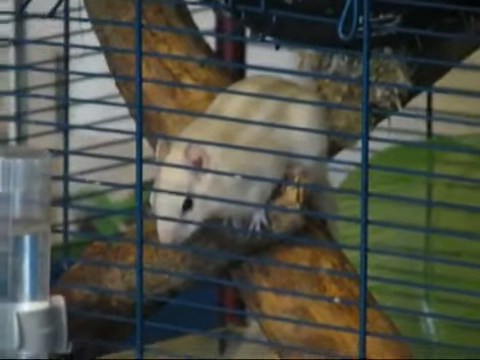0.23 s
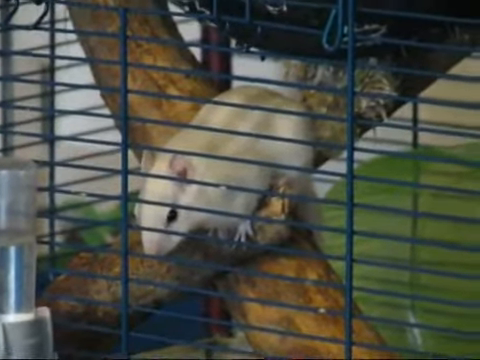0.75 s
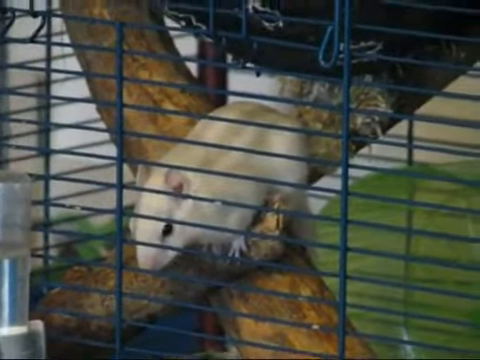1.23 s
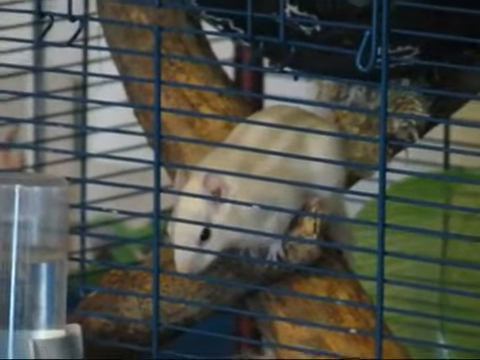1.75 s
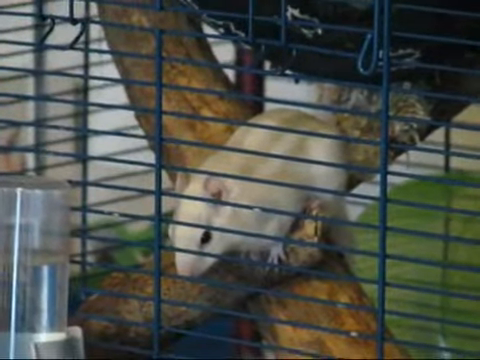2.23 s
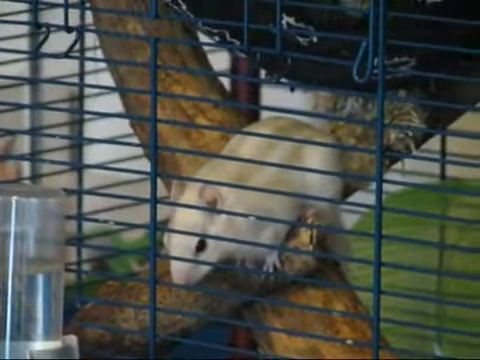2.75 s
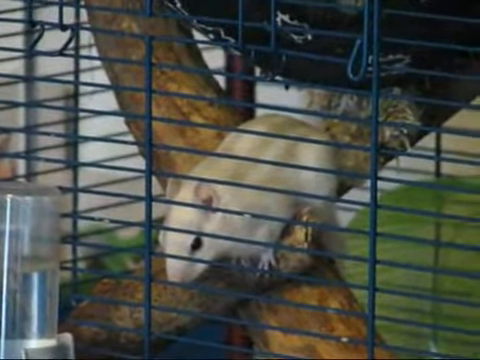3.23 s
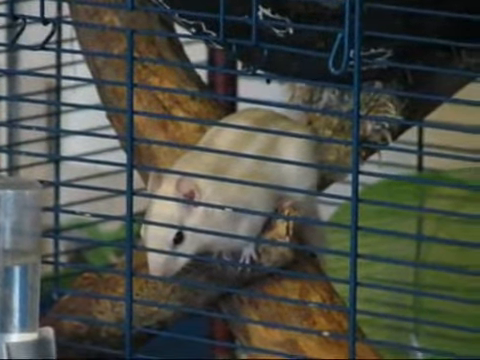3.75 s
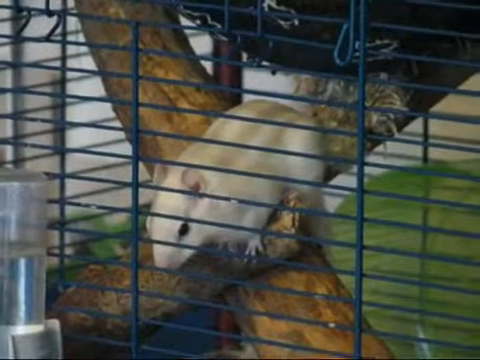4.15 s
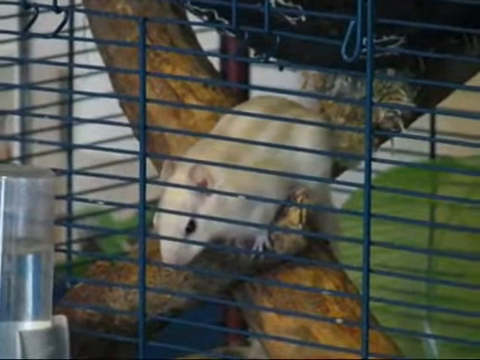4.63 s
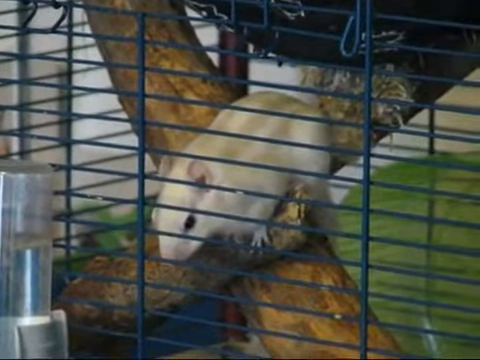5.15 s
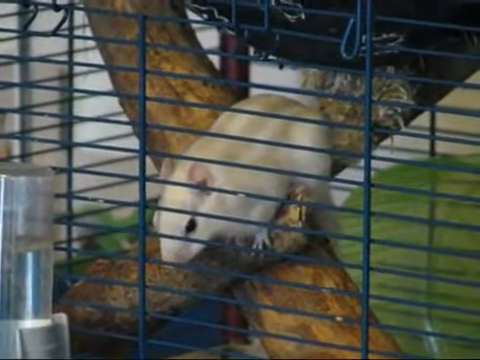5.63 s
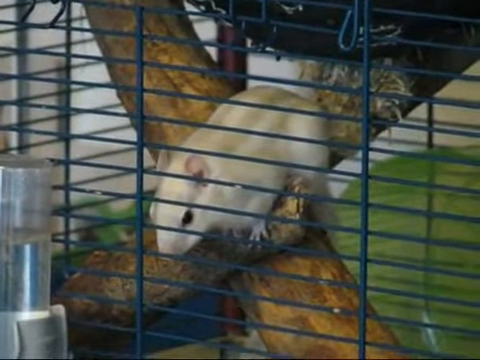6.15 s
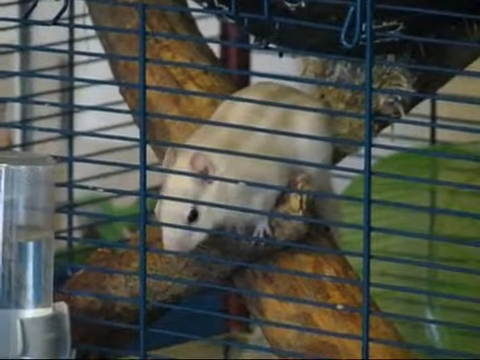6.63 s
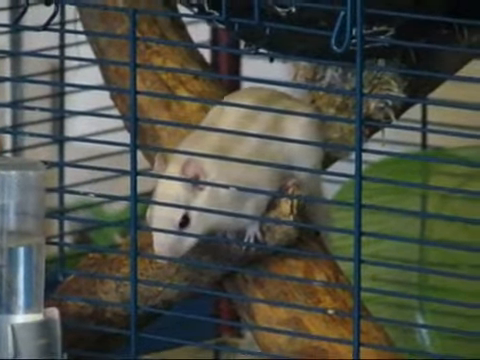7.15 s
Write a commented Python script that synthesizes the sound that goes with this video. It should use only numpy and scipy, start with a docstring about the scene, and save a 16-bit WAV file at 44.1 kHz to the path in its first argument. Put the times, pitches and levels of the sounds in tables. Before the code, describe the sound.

Seven brief, high-pitched squeaky chirps from a small pet rodent in a cage, about a second apart, over quiet room noise.

```python
"""Small furnished room: a caged squirrel gives seven short whistled chirps.
Each arches up in pitch and slides down; perch, bars and wall echo it at once, the room rings on.
Behind it: room murmur, a far motor hum, a faint breathy tone, soft thuds in the house.
A camera adds hiss, a thin whine, rasp on loud sound and a gain control that ducks after each chirp."""
import sys
import numpy as np
from scipy import signal
from scipy.fft import rfft, irfft, next_fast_len
from scipy.io import wavfile
from scipy.ndimage import uniform_filter1d, minimum_filter1d

SR = 44100
rng = np.random.default_rng(int(sys.argv[2]) if len(sys.argv) > 2 else 0)


def transcribe(u):
    """Save the signal u as a 16-bit wav file named by the first command-line argument.

    u: samples, shape (n,) or (channels, n), limited to [-1, 1]; the rate is SR.
    q: integer samples, one column per channel.
    """
    v = np.clip(np.atleast_2d(u).T, -1, 1)
    q = np.round(v * 32767).astype(np.int16)
    wavfile.write(sys.argv[1], SR, q)


N = 325458

# (start [s], top at [ms], top [Hz], bottom at [ms], bottom [Hz], slide lateness [exponent],
#  level at top [dB], octave re whistle [dB])
SQUIRREL_CHIRPS = [(0.5155, 9.5, 11020, 33, 7570, 2.1, -12.5, -51.5),
                   (1.547, 13, 10550, 38, 5686, 0.84, -14.5, -21.5),
                   (2.934, 17, 10450, 39, 6400, 1.17, -14.5, -24.5),
                   (4.468, 11.2, 9210, 36.5, 6176, 1.6, -14, -20),
                   (5.36, 13, 10030, 38, 5635, 1.1, -14.5, -11.5),
                   (6.656, 15, 10520, 41, 6070, 1.45, -13.5, -19.5),
                   (7.2434, 13.3, 9630, 30, 5046, 0.99, -15, -13.5)]
# perch, bar and wall echo delays: (left [ms], right [ms])
ECHO_DELAYS_MS = [(.590, .604), (1.441, 1.442), (2.128, 2.146), (2.734, 2.746), (5.743, 4.285),
                  (7.5, 7.954)]
# same echoes re direct sound: (left [dB], right [dB])
ECHO_GAINS_DB = [(-12, -8), (-5, -3), (-12, -10), (-15, -15), (-15, -15), (-15, -17)]
# colour of direct sound and echoes: (frequency [Hz], gain [dB])
NEAR_COLOUR_DB = [(5000, -0.5), (6500, -3), (8500, 0.5), (11000, -0.5), (12500, -3), (15000, -11.5)]
# their balance: (frequency [Hz], left minus right [dB])
NEAR_BALANCE_DB = [(5000, 4.5), (7000, -3.5), (8500, 0.5), (10000, -4), (14000, -1.2)]
# room decay: (frequency [Hz], T60 [s])
TAIL_T60_S = [(5000, 0.23), (8000, 0.23), (10500, 0.24), (11500, 0.13), (12500, 0.28), (15000, 0.14)]
# room tail colour: (frequency [Hz], gain [dB])
TAIL_COLOUR_DB = [(5000, 13), (7000, 8), (8500, 16.5), (10500, -3), (11200, 3.5), (12300, 12),
                  (15000, -1.5)]
# murmur and microphone hiss: (frequency [Hz], relative density [dB])
MURMUR_COLOUR_DB = [(12, -27), (28, -7), (40, 2.5), (52, -13), (97, -7), (125, -9.5), (216, -10.5),
                    (459, -22), (1030, -19.5), (1220, -25), (2200, -27), (2820, -31.5), (6180, -35.5),
                    (14700, -43), (16000, -54)]
# stereo width: (frequency [Hz], side re mid [dB])
MURMUR_WIDTH_DB = [(30, -21.5), (200, -18.5), (380, -10), (1290, -8.5), (2380, -4), (4400, -1), (15000, 1)]
# murmur swell: (time [s], level [dB])
MURMUR_LEVEL_DB = [(0, -53), (2.7, -52.5), (7.38, -54.5)]
# far motor: (start [s], length [s], level [dB])
HUM_SPELLS = [(4.748, 0.46, -58.5), (5.798, 1.7, -55.5)]
# breathy tone: (start [s], length [s], centre [Hz], level [dB])
TONE_SPELLS = [(0.05, .45, 2165, -74), (.6, .7, 2190, -74.5), (2.25, .7, 2195, -74)]
# thuds: (start [s], frequency [Hz], peak [dB])
HOUSE_THUDS = [(5.52, 46, -40.5), (5.56, 97, -42.5), (5.631, 39.9, -40.5), (5.659, 88, -50),
               (5.75, 25, -42.5), (5.9, 33.1, -51.5), (5.95, 36, -44.5)]
# camera whine: (frequency [Hz], level [dB])
WHINE_TONES = [(8010, -67.5), (8400, -83.5)]

TIME_S = np.arange(N) / SR
PAN = np.array([[.5], [-.5]])  # left, right share of a level difference


def squirrel_chirp(top_ms, top_hz, bottom_ms, bottom_hz, lateness, level_db, octave_db):
    """Near-pure whistle on an arched pitch; the higher the arch, the softer the start."""
    attack_ms, linger_ms, close_ms = 3, 6, 4.3
    start_hz, soft_db_per_khz, slide_gain_db = .76 * top_hz, 15.5, 2.2
    end_ms = bottom_ms + linger_ms
    ms = np.arange(int(end_ms * SR / 1000)) * 1000 / SR
    rise_left = np.clip(1 - ms / top_ms, 0, 1)
    fall = np.clip((ms - top_ms) / (bottom_ms - top_ms), 0, 1)
    slide = .55 * ease(fall ** lateness) + .45 * fall ** lateness
    hz = top_hz - (top_hz - start_hz) * ease(rise_left ** 1.2) - (top_hz - bottom_hz) * slide
    phase = 2 * np.pi * np.cumsum(hz) / SR
    soft_db = soft_db_per_khz * (top_hz - 9300) / 1000
    level = from_db(level_db - soft_db * rise_left ** 1.3 + slide_gain_db * fall)
    edges = np.minimum(1, np.minimum(ms / attack_ms, (end_ms - ms) / close_ms)) ** 2
    octave = from_db(octave_db - rise_left) * breathy_octave(phase)  # grows 1 dB up to the top
    return np.sqrt(2) * edges * level * (np.sin(phase) + octave)


def breathy_octave(phase, breath_share=.8, grain_ms=.8):
    """Second harmonic, part steady, part breath noise."""
    pole = np.exp(-1000 / (grain_ms * SR))
    a, b = unit_rms(smooth(rng.standard_normal((2, SR // 10)), pole))[:, -len(phase):]
    breath = a * np.sin(2 * phase) + b * np.cos(2 * phase)
    return np.sqrt(1 - breath_share) * np.sin(2 * phase) + np.sqrt(breath_share / 2) * breath


def squirrel():
    """Seven whistles from one spot."""
    out = np.zeros(N)
    for start_s, *shape in SQUIRREL_CHIRPS:
        chirp = squirrel_chirp(*shape)
        i = round(start_s * SR)
        out[i:i + len(chirp)] += chirp
    return out


def cage_response(hz):
    """Near echoes comb the direct sound."""
    echoes = np.exp(-2j * np.pi * hz * np.array(ECHO_DELAYS_MS)[:, :, None] / 1000)
    comb = 1 + (from_db(ECHO_GAINS_DB)[:, :, None] * echoes).sum(axis=0)
    return comb * from_db(at_hz(NEAR_COLOUR_DB, hz) + at_hz(NEAR_BALANCE_DB, hz) * PAN)


def room_tail(build_ms=15):
    """Dense reflections build up, then die band by band."""
    t = np.arange(SR // 2) / SR
    tail, edges_hz = 0, np.geomspace(4000, 17000, 20)
    for low_hz, high_hz in zip(edges_hz, edges_hz[1:]):
        band = band_pass(rng.standard_normal((2, len(t))), low_hz, high_hz)
        centre_hz = np.sqrt(low_hz * high_hz)
        t60_s = at_hz(TAIL_T60_S, centre_hz)
        decay = from_db(-60 * t / t60_s) / np.sqrt(t60_s * SR / np.log(1e6))  # unit energy
        tail += band * from_db(at_hz(TAIL_COLOUR_DB, centre_hz)) * decay
    return tail * (1 - np.exp(-(1000 * t / build_ms) ** 2))


def room(x):
    """Direct sound, cage echoes and tail, in stereo."""
    size = next_fast_len(N + SR)
    response = cage_response(np.fft.rfftfreq(size, 1 / SR)) + rfft(room_tail(), size)
    return irfft(rfft(x, size) * response, size)[:, :N]


def murmur(waver_db=.5, waver_hz=3.5, pan_db=.96):
    """Gently uneven room noise and hiss: centred bass, wide treble."""
    hz = np.fft.rfftfreq(N, 1 / SR)
    mid, side = rfft(rng.standard_normal((2, N))) * from_db(at_hz(MURMUR_COLOUR_DB, hz))
    mid, side = irfft(mid, N), irfft(side * from_db(at_hz(MURMUR_WIDTH_DB, hz)), N)
    drift = unit_rms(smooth(rng.standard_normal(N + SR), np.exp(-2 * np.pi * waver_hz / SR))[SR:])
    level_db = np.interp(TIME_S, *np.transpose(MURMUR_LEVEL_DB)) - waver_db * drift + pan_db * PAN
    return from_db(level_db) * (mid + side * [[1], [-1]]) / np.std(mid)


def house_thuds(rise_s=.028):
    """Low tones that swell and die quickly."""
    out = 0
    for start_s, hz, peak_db in HOUSE_THUDS:
        age_s = np.maximum(TIME_S - start_s, 0)
        envelope = (age_s / rise_s * np.exp(1 - age_s / rise_s)) ** 2
        out += from_db(peak_db) * envelope * np.sin(2 * np.pi * hz * age_s)
    return out


def motor_hum(hz=71.6):
    """Far motor: one low tone that comes and goes."""
    level = sum(from_db(db) * spell(start_s, length_s, fade_s=.13)
                for start_s, length_s, db in HUM_SPELLS)
    return level * np.sqrt(2) * np.sin(2 * np.pi * hz * TIME_S)


def far_tone(half_width_hz=7):
    """Faint breathy tone: spells of narrow noise."""
    return sum(from_db(db) * spell(start_s, length_s, fade_s=.1)
               * band_noise(hz - half_width_hz, hz + half_width_hz)
               for start_s, length_s, hz, db in TONE_SPELLS)


def camera_whine():
    """Two thin steady tones."""
    return sum(np.sqrt(2) * from_db(db) * np.sin(2 * np.pi * hz * TIME_S) for hz, db in WHINE_TONES)


def gain_control(x, knee_db=-27.5, slope=.56, release_db_per_s=57.5, attack_s=.012, lag_s=.018):
    """Ducks late on level above the knee, then recovers steadily."""
    level_db = 10 * np.log10(uniform_filter1d(np.mean(x ** 2, axis=0), size=441) + 1e-12)
    cut_db = slope * np.maximum(level_db - knee_db, 0)
    release_db = release_db_per_s * TIME_S
    cut_db = np.maximum.accumulate(cut_db + release_db) - release_db
    cut_db = smooth(cut_db, np.exp(-2 / (attack_s * SR)))
    return x * from_db(-np.interp(TIME_S - lag_s, TIME_S, cut_db))


def microphone_distortion(x, bend=.02, rasp_db=-29, rasp_exponent=1.7):
    """Second-order bend, plus rasp that grows faster than the sound."""
    envelope = np.sqrt(uniform_filter1d(x ** 2, size=44) + 1e-12)
    rasp = from_db(rasp_db) * envelope ** rasp_exponent * band_noise(1310, 13500)
    return x + bend * x ** 2 + rasp


def limiter(x, ceiling_db=-2):
    """One smoothed gain holds the peaks of both channels."""
    gain = np.minimum(1, from_db(ceiling_db) / (np.abs(x).max(axis=0) + 1e-9))
    return x * uniform_filter1d(minimum_filter1d(gain, size=89), size=45)


def from_db(db):
    """Level to gain."""
    return 10 ** (np.asarray(db) / 20)


def at_hz(points, hz):
    """Curve read on a log frequency axis."""
    points_hz, values = np.transpose(points)
    return np.interp(np.log(hz + 1), np.log(points_hz), values)


def unit_rms(x):
    """Scale to rms 1."""
    return x / np.sqrt(np.mean(x ** 2))


def smooth(x, pole):
    """Double-pole low-pass."""
    return signal.lfilter([(1 - pole) ** 2], [1, -2 * pole, pole * pole], x)


def band_pass(x, low_hz, high_hz):
    """Band-pass, 12 dB per octave."""
    return signal.sosfilt(signal.butter(2, [low_hz, high_hz], "band", fs=SR, output="sos"), x)


def band_noise(low_hz, high_hz):
    """Noise band, rms 1."""
    return unit_rms(band_pass(rng.standard_normal(N + SR), low_hz, high_hz)[SR:])


def ease(x):
    """S-curve, 0 to 1."""
    return np.sin(np.pi / 2 * x) ** 2


def spell(start_s, length_s, fade_s):
    """Fade in, hold, fade out."""
    age_s = TIME_S - start_s
    return ease(np.clip(np.minimum(age_s, length_s - age_s) / fade_s, 0, 1))


def scene():
    """Squirrel in its room over the background."""
    out = room(squirrel()) + murmur()
    faint = house_thuds() + motor_hum() + far_tone() + camera_whine()
    return out + faint * from_db(PAN)  # 1 dB to the left


def record(dry):
    """Camera chain: gain control, distortion, limiter, low-pass."""
    out = limiter(microphone_distortion(gain_control(dry)))
    stop_hz = 16500
    return signal.sosfilt(signal.cheby2(12, 80, stop_hz, fs=SR, output="sos"), out)


dry = scene()
out = record(dry)
transcribe(out)
```